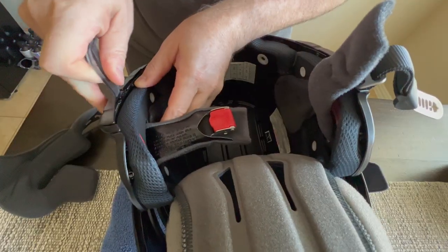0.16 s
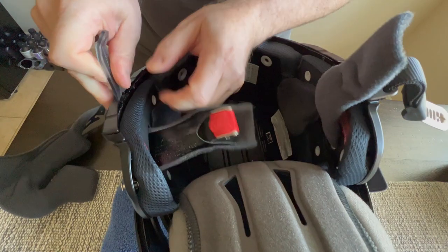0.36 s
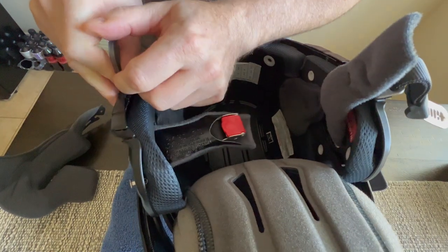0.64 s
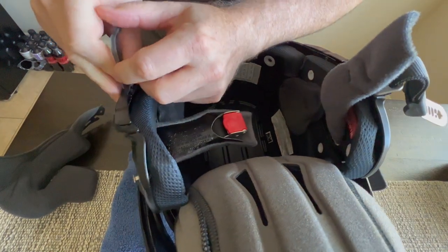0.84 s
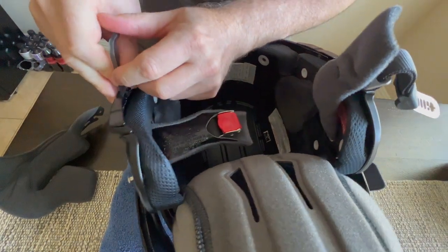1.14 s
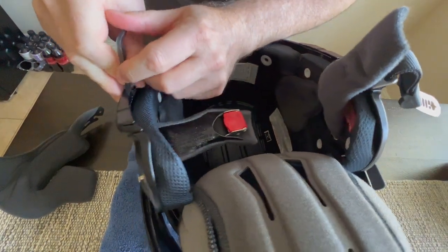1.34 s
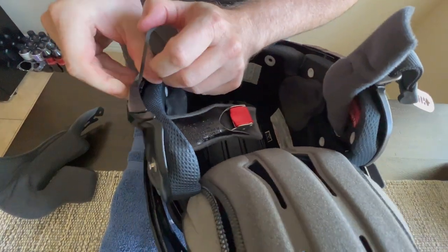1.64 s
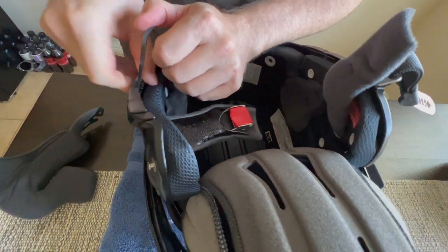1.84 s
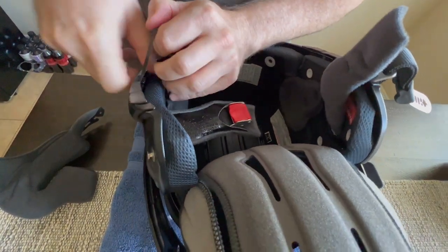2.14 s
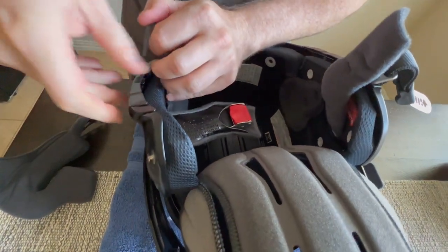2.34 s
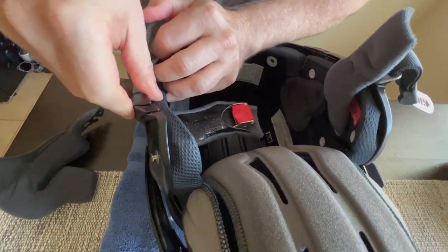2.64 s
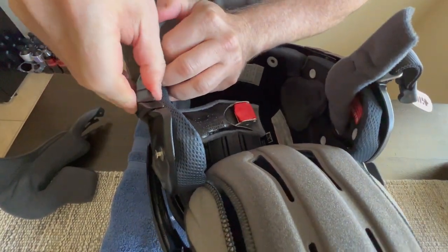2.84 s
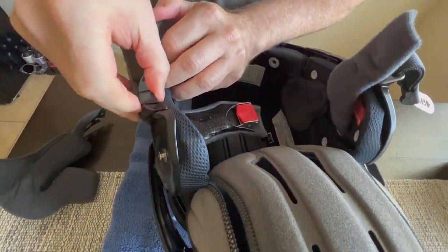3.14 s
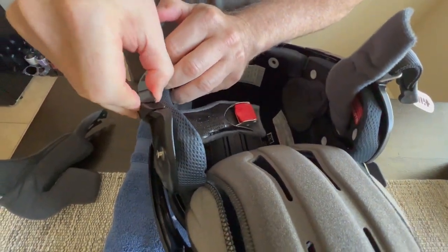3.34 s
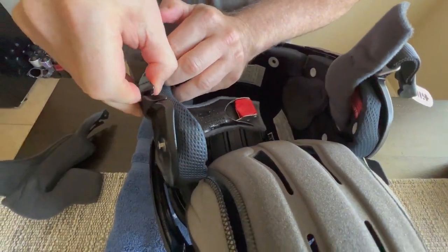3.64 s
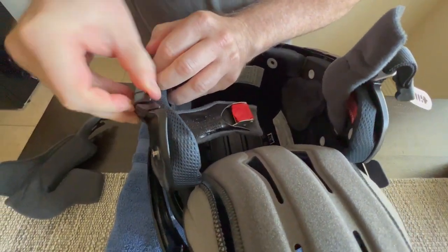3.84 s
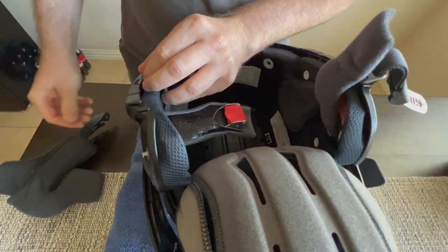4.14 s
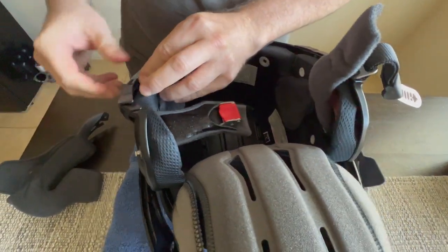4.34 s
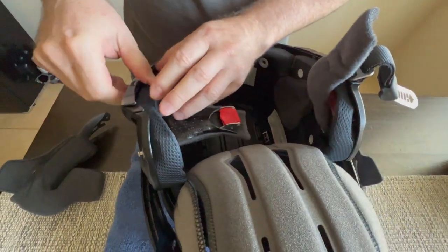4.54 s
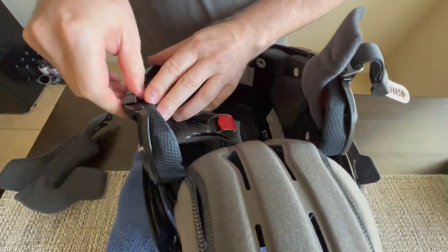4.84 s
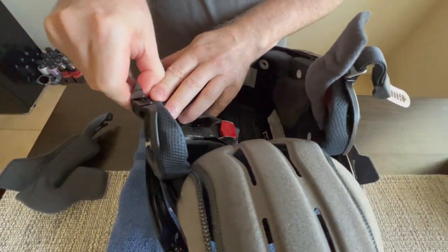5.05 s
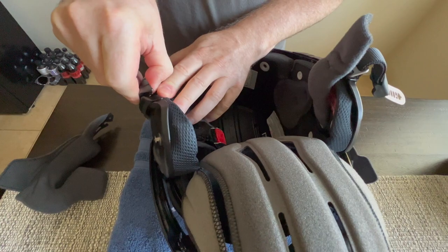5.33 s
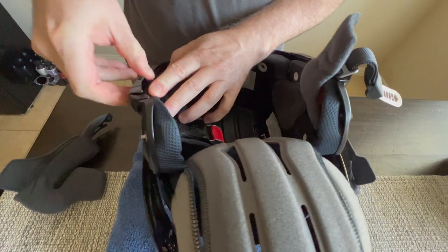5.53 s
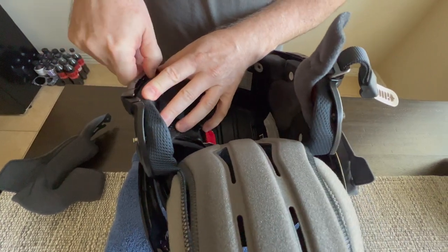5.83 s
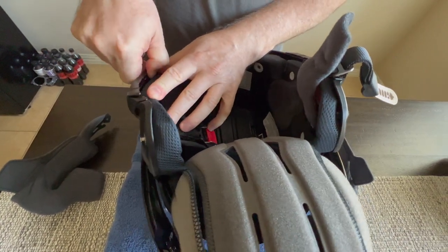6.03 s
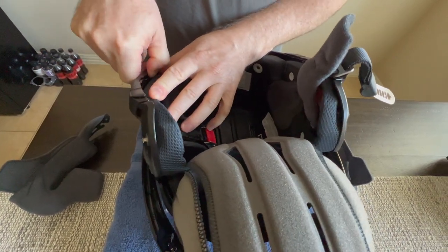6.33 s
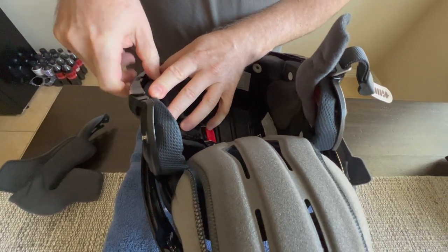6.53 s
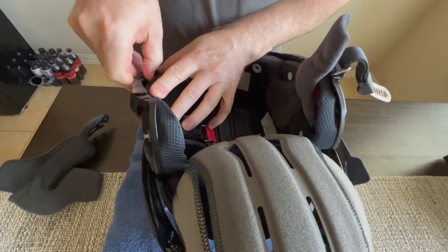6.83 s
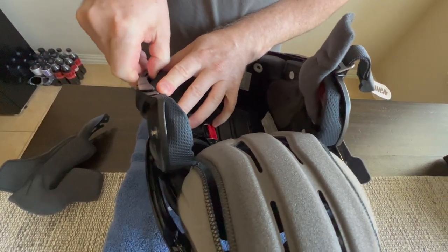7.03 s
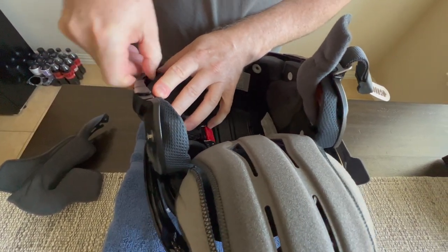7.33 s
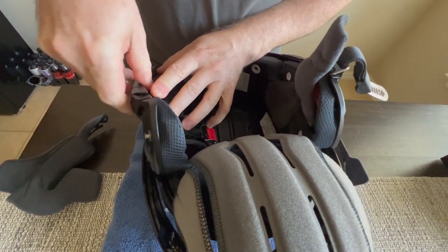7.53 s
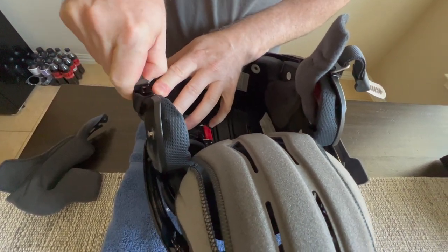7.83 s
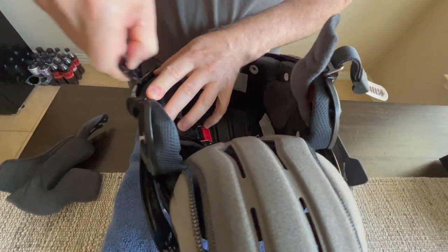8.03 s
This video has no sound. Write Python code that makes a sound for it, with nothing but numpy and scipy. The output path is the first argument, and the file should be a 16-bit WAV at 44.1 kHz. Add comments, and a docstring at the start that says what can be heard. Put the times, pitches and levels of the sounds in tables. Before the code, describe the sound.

Someone pries at a plastic fitting inside a helmet, heard in close stereo a little left of centre. After a brief metal tinkle come soft taps, padding rustle and thin squeaky scrapes. A burst of snaps with a short twang is followed by a small piece bouncing further away. The clicking and scraping resume and end in a cluster of sharp cracks. The room adds a short echo, quiet air and a faint hum.

```python
"""A living room, a stereo pair of microphones close to a helmet on a table. A small plastic prying tool
works at a clip inside: its taps ring the shell, its blade scrapes and squeaks in tiny slips, a strap
ring tinkles and fingers rub the padding. The clip snaps free with a twang and something small clatters
down further off. After more picking the part breaks loose with several cracks.
The walls answer each sound; behind it all lie quiet room air and a faint appliance hum."""
import sys
import numpy as np
from scipy import signal
from scipy.fft import rfft, irfft, next_fast_len
from scipy.io import wavfile

SR = 44100
rng = np.random.default_rng(int(sys.argv[2]) if len(sys.argv) > 2 else 0)


def unload_wav(signal):
    """Save mono or channel-first audio to the path in sys.argv[1] as 16-bit WAV at rate SR, clipped to [-1, 1]."""
    wavfile.write(
        sys.argv[1],
        SR,
        np.round(np.clip(np.atleast_2d(signal).T, -1, 1) * 32767).astype(np.int16),
    )


N = 360738
TIME = np.arange(N) / SR
TREBLE_HZ = 1500  # modes above this shift from blow to blow and reach the room wider

# resonances of the shell and its plastic fittings: pitch_hz, width_hz, level_db
SHELL_MODES = [(45.63, 26, -15.5), (67.4, 20, -9.5), (117, 36, -12.5), (152, 21, -10.5), (231, 35, -6.5),
               (362, 30, 4.5), (471, 70, -2.5), (600, 89, -7), (660, 51, -3.5), (850, 450, -10),
               (937, 120, -0.5), (1047, 75, -3.5), (1170, 40, -4), (1266, 49, -6.5), (1660, 220, -3),
               (2080, 310, -5), (2570, 300, -4), (2970, 310, -3.5), (3300, 470, -5.5), (3890, 560, -7),
               (4180, 350, -5), (4640, 530, -6), (5200, 900, -5), (5860, 580, 3), (7230, 300, 0),
               (8900, 1100, 3.5), (12200, 380, 1), (15000, 1300, -2)]
# light contacts on the shell: start_s, level_db, hardness_db (below 0 a fingertip, above 0 the tool)
SHELL_TAPS = [(.012, -59, -2), (0.25, -55.5, 1.5), (0.298, -56, -3), (0.323, -57.5, -5), (0.42, -66.5, 12),
              (0.488, -61.5, -6.5), (0.741, -65, -3.5), (.894, -74.5, -15), (0.928, -69, -6),
              (1.366, -59, -6), (1.404, -65, -6), (1.485, -66.5, -5), (1.709, -66.5, -11.5),
              (2.095, -60, -5.5), (2.171, -57, -2.5), (2.381, -70, -13), (2.668, -66, -4),
              (2.505, -60.5, 5), (2.77, -60, -2), (2.934, -55.5, -7.5), (3.111, -55.5, -9.5),
              (3.252, -59.5, -15), (3.308, -63.5, -13), (3.369, -59, -12), (3.41, -78, 17),
              (3.492, -65.5, -15), (3.765, -43, -4.5), (3.834, -46.5, -2.5), (4.24, -53.5, -13),
              (4.745, -61.5, -11), (4.832, -49.5, -6), (5.031, -59, 7), (5.114, -58, -12),
              (5.295, -52, -11.5), (5.498, -43.5, 0), (5.61, -50, -2.5), (6.139, -44.5, -3),
              (6.148, -54, -7), (6.267, -63.5, 8.5), (6.347, -58.5, -1.5), (6.408, -61, -6.5),
              (6.672, -55.5, -1.5), (6.947, -59.5, 3), (7.011, -63.5, 9.5), (7.085, -54, 0.5),
              (7.094, -51, -7.5), (7.302, -57, -7.5), (7.367, -53.5, -2), (7.52, -40.5, -7)]
# landings of the loose piece: start_s, thump_db, knock_db, crack_db, edge_db
LANDINGS = [(3.965, -39.5, -35.5, -42, -57), (3.978, -48, -38.5, -56, -72), (4.0369, -47, -39, -39, -49),
            (4.058, -52, -44.5, -35.5, -37.5), (4.067, -51, -50, -42.5, -52), (4.075, -59, -47, -58, -60),
            (4.128, -53.5, -47, -44, -47), (4.158, -50, -48.5, -55, -48.5), (4.232, -70, -61, -67, -59)]


def snapping_catches():
    """Close up, the part jolts and its catches let go, ringing the shell: direct sound and room sends."""
    # start_s, thump_db, knock_db, crack_db, edge_db, looseness, send_db, three favoured pitches_hz
    snaps = [(1.18, -37, -39.5, -48.5, -73, 0.94, -6.5, 260, 1263, 1660),
             (3.5792, -49, -30.5, -29.5, -23.5, 0.36, -4.5, 470, 1210, 2530),
             (3.5907, -41, -37, -21.5, -30, 0.09, -1, 470, 950, 2570),
             (3.603, -43, -34.5, -30.5, -42, 0.6, 0, 70, 1180, 1860),
             (3.678, -43, -31.5, -32.5, -37, 0.7, -2.5, 470, 1260, 4140),
             (3.7263, -42.5, -33, -37, -41.5, 0.63, -6.5, 470, 1040, 5200),
             (5.498, -39, -53, -43, -51.5, .9, -5, 350, 605, 2980),
             (5.612, -45.5, -44, -48, -59, .9, -3, 470, 680, 1660),
             (6.196, -38, -55, -50.5, -57, 1.55, -8, 330, 1170, 4560),
             (7.6235, -42.5, -29.5, -32.5, -39, 0.42, -4.5, 350, 960, 3890),
             (7.728, -33, -28.5, -25, -32, 0.66, -2.5, 250, 680, 3700),
             (7.743, -28, -30, -27, -29.5, 1.5, -11, 340, 1300, 5200),
             (7.869, -26.5, -27, -30.5, -33, 0.84, -2.5, 470, 900, 3300),
             (7.8801, -33.5, -39, -32, -37, 2, -2, 120, 1260, 2130),
             (7.8993, -32.5, -24.5, -27.5, -33, 2.4, -10.5, 350, 1130, 5130)]
    snaps = np.array(snaps)
    return strikes(snaps[:, :5], SHELL_MODES, send_db=snaps[:, 6], looseness=snaps[:, 5],
                   pan_share=.56, spots_hz=snaps[:, 7:])


def clip_twang(start_s, t60_s):
    """The clip springs free and rings on."""
    tones = [(1173, -42.5), (2521, -40.5), (2627, -38.5), (2810, -42), (2904, -41), (4042, -44)]
    out, t = np.zeros(N), TIME[:SR]
    add(out, sum(ringing(t, hz, db, t60_s) for hz, db in tones), start_s)
    return out


def shell_taps():
    """Tool and fingers touch the shell; a harder contact has less thump and more crack."""
    # a tap's balance at hardness 0: thump_db, knock_db, crack_db, edge_db
    balance_db = [-4, -2, -2, -14]
    # gain per dB of hardness: thump_db, knock_db, crack_db, edge_db
    hardness_gain = [-0.91, 0.042, 0.86, 0.42]
    start_s, level_db, hardness_db = np.vstack([SHELL_TAPS, grip_ticks(per_s=3.5, level_db=-72.5)]).T
    registers_db = level_db[:, None] + np.array(balance_db) + np.outer(hardness_db, hardness_gain)
    touches = np.column_stack([start_s, registers_db])
    return strikes(touches, SHELL_MODES, send_db=-.5, looseness=1.32, pan_share=1)


def grip_ticks(per_s, level_db, spread_db=4, count=40):
    """The shifting grip ticks faintly at random: rows of start_s, level_db, hardness_db."""
    start_s = np.cumsum(rng.exponential(1 / per_s, count))
    offset_db, hardness_db = spread_db * rng.standard_normal((count, 2)).T
    ticks = np.column_stack([start_s, level_db + offset_db, hardness_db])
    return ticks[start_s < TIME[-SR // 10]]


def scraping():
    """The friction of tool and fingers rings the thin blade."""
    # the blade's resonances: pitch_hz, width_hz, level_db
    blade_modes = [(2860, 83, 2.5), (4200, 85, -10.5), (4950, 290, -4), (8500, 270, 9)]
    rub = sliding(rise_share=.28, fall_share=.16, resting_db=[-77, -84, -90], restless_db=.5)
    blade = sum(from_db(db) * resonate(rub, hz, width) for hz, width, db in blade_modes)
    return from_db(-1.5) * (rub + blade)


def sliding(rise_share, fall_share, resting_db, restless_db, grit_db=-62, firm_db=-50):
    """Padding rustle, shell rub and blade scrape swell with each stroke; the fingers never quite rest."""
    # short slides: start_s, length_s, level_db, bite_db (below 0 on padding, above 0 blade on plastic)
    slides = [(0, 0.086, -69, -1), (0.202, 0.1, -62.5, 1), (.363, 0.055, -65.5, 1),
              (1.004, 0.055, -70, -2.5), (1.517, 0.056, -57.5, 0), (2.365, 0.023, -74.5, 10.5),
              (2.434, 0.048, -77.5, 13), (2.5, 0.092, -61, -2.5), (2.72, 0.062, -63, 1),
              (2.849, 0.02, -68, 4.5), (2.985, 0.048, -63, -5), (3.113, 0.011, -69, 9),
              (3.274, 0.032, -64, -13), (4.35, 0.18, -68.5, 4), (4.643, 0.036, -57.5, 15),
              (4.692, 0.068, -67.5, 13.5), (5.477, 0.013, -46.5, -4), (5.533, 0.012, -60.5, 10),
              (5.735, 0.041, -59, 2.5), (5.77, 0.024, -47.5, 1), (5.795, 0.037, -60, -1),
              (5.86, .11, -69, -3), (6.439, 0.055, -73, 6), (6.682, 0.088, -62.5, -5.5),
              (7.273, 0.074, -65, -10.5), (7.509, 0.015, -53.5, 2)]
    # rustle, rub and scrape: slips_per_s, spectrum as (pitch_hz, density_db)
    frictions = [(700, [(100, -14), (220, -6.5), (360, -1.5), (500, -9.5), (700, -6.5), (1100, -32.5),
                 (2500, -57.5)]), (2000, [(400, -32), (700, -12), (1050, -6), (1300, -7), (1900, -9),
                 (2600, -29), (6000, -60.5)]), (3500, [(1100, -29), (2100, 2.5), (2900, -1), (3500, -6),
                 (4500, -2), (7000, -12), (10000, -16), (12000, -13.5), (15000, -24), (17000, -37)])]
    # gain per dB of bite: rustle_db, rub_db, scrape_db
    bite_gain = [-0.68, 0, 0.89]
    # one long drag of the blade along the rim: time_s, scrape_db, rub_db
    rim_drag = [(1.68, -95, -88), (1.736, -62, -81), (1.776, -63, -67), (1.928, -54.5, -58),
                (2.07, -74, -70), (2.118, -55, -53.5), (2.162, -57.5, -66), (2.175, -50.5, -51),
                (2.2, -54, -64), (2.225, -84, -88), (2.28, -100, -99)]
    # trims within that drag: rustle_db, rub_db, scrape_db
    drag_trim_db = [-2, 2, -1.5]
    # fine grit torn by a hard-pressed blade: pitch_hz, density_db
    grit_spectrum = [(2500, -19), (4500, -3.5), (8000, -10), (12000, -6), (15500, -17.5), (17000, -30)]
    out, strokes = np.zeros(N), slides + skids()
    grip_db = restless_db * flutter(3.2)
    drag_s, scrape_db, rub_db = np.transpose(rim_drag)
    dragging = (TIME > drag_s[0]) * (TIME < drag_s[-1])
    for k, ((slips_per_s, spectrum), drag_db) in enumerate(zip(frictions, (rub_db, rub_db, scrape_db))):
        drag = from_db(np.interp(TIME, drag_s, drag_db) + drag_trim_db[k]) * dragging
        pressure = from_db(resting_db[k] + grip_db) + drag
        for start, length, level_db, bite_db in strokes:
            t = TIME[:int((length + .1) * SR)]
            rise = 1 - np.exp(-t / (rise_share * length))
            fall = np.exp(-np.maximum(t - length, 0) / (fall_share * length))
            add(pressure, from_db(level_db + bite_gain[k] * bite_db) * rise * fall, start)
        out += pressure * friction(spectrum, slips_per_s)
    firmness = pressure / from_db(firm_db)  # the last pressure is the blade's
    return out + from_db(grit_db) * firmness ** 2 * friction(grit_spectrum, slips_per_s=2300)


def skids(length_s=.046, level_db=-75.5, follow_share=.85, bite_db=-4.5):
    """The hand skids on in a short stroke after each tap, louder after a stronger one."""
    mean_db = np.mean(np.array(SHELL_TAPS)[:, 1])
    return [(s, length_s, level_db + follow_share * (db - mean_db), bite_db) for s, db, _ in SHELL_TAPS]


def friction(spectrum, slips_per_s, uneven_db=2, clump_db=2.5):
    """Tiny slips of uneven size come in clumps; rms 1."""
    sizes = rng.standard_normal(N) * from_db(uneven_db * rng.standard_normal(N) + clump_db * flutter(90))
    return colour((rng.random(N) < slips_per_s / SR) * sizes, spectrum)


def blade_squeaks(width_hz):
    """The blade catches and its slips fall nearly into step: a rough tone that swells and fades."""
    # start_s, length_s, pitch_hz, level_db
    squeaks = [(1.83, .14, 4170, -66), (1.868, 0.105, 2830, -52), (2.119, .06, 4900, -62),
               (2.127, .07, 4240, -63), (2.497, 0.051, 3400, -65), (2.849, 0.039, 4300, -67),
               (3.107, 0.035, 4250, -60.5), (4.636, 0.037, 3223, -53.5), (4.641, .035, 4500, -51),
               (4.648, 0.024, 5960, -55), (4.739, 0.035, 2970, -52.5)]
    out = np.zeros(N)
    for start, length, hz, level_db in squeaks:
        tone = rms_one(resonate(resonate(rng.standard_normal(SR), hz, width_hz), hz, width_hz))
        swell = signal.windows.cosine(int(length * SR))
        add(out, from_db(level_db) * swell * tone[:len(swell)], start)
    return out


def strap_rings(favour_db, scratch_db, scratch_s, split_hz):
    """Steel rings scratch over each other and ping; a ring's modes come in close pairs that beat."""
    # the rings touch: start_s, level_db, favoured_hz
    clinks = [(.398, -47, 8740), (0.4205, -39, 8740), (0.4235, -38, 8740), (0.4906, -29.5, 7900)]
    # a ring's modes: pitch_hz, level_db, t60_s
    modes = [(5970, -20, 0.14), (7500, -17, 0.08), (7920, -10, 0.061), (8737, -6.5, 0.063),
             (10700, -20, 0.06), (11110, -18, 0.074), (12600, -21, 0.043), (15140, -6, 0.049)]
    out, t = np.zeros(N), TIME[:SR // 4]
    for start, level_db, spot_hz in clinks:
        ping = np.zeros(len(t))
        for hz, db, t60 in modes:
            for offset_hz in (-split_hz, split_hz):
                mode_db = db - 5 + favour_db * nearness(hz, spot_hz) + rng.normal(0, 1.5)
                ping += ringing(t, hz + offset_hz * rng.random(), mode_db, t60)
        hiss = signal.sosfilt(band_pass(4800, 10800), rng.standard_normal(len(t)))
        scratch = from_db(scratch_db) * hiss * np.exp(-t / scratch_s)
        attack = 1 - np.exp(-t / .001)
        add(out, from_db(level_db) * attack * (ping + scratch), start)
    return out


def falling_piece():
    """A loose piece lands and bounces further from the microphones, with more room in its sound."""
    # resonances of the piece and the surface it hits: pitch_hz, width_hz, level_db
    modes = [(184, 87, -0.5), (367, 83, 5.5), (500, 150, 10), (680, 430, 12.5), (980, 350, 9),
             (1230, 180, 15.5), (1430, 210, 12), (1750, 440, 10), (2200, 500, 1), (2840, 540, -2.5),
             (3530, 990, 4.5), (4300, 1000, 4), (5200, 1100, 7.5), (6090, 750, 20.5), (6670, 760, 14),
             (7850, 1500, 12.5), (9100, 700, 20), (11200, 1100, 14.5), (13000, 1400, 19), (15450, 910, 1.5)]
    return strikes(LANDINGS, modes, send_db=6.5, looseness=1.07, pan_share=1.3)


def piece_ring():
    """The loose piece sings on briefly after each landing."""
    # its lasting tones: pitch_hz, level_db (relative to the knock), t60_s
    tones = [(3244, -14, 0.18), (5690, -16, 0.083)]
    out, t = np.zeros(N), TIME[:SR // 2]
    for start, _, knock_db, _, _ in LANDINGS:
        for hz, db, t60 in tones:
            add(out, ringing(t, hz, knock_db + db + rng.normal(0, 1.5), t60), start)
    return out


def strikes(events, modes, send_db, looseness, pan_share, spots_hz=None, send_count=5):
    """Blows on one body: direct sound at the microphones, and room sends from a few spots in turn."""
    # thump, knock, crack and edge:
    # low_hz, high_hz, travel_s, chatter_decay_s, chatter_share, left_over_right_db, right_lag_s, room_db
    registers = [(35.68, 490, 0.00032, 0.0024, 0.43, 3, .00012, -8.5),
                 (544, 1500, 0.00063, 0.003, .65, 4.5, 0.00019, -9.5),
                 (1340, 5500, 0.00084, 0.0029, 0.59, 10.5, 0.00024, -2.5),
                 (5730, 15000, 0.001, 0.0027, 0.64, 4.5, .00027, -5)]
    direct, sends = np.zeros((2, N)), np.zeros((send_count, N))
    send_db, looseness = np.broadcast_to(send_db, len(events)), np.broadcast_to(looseness, len(events))
    # a harder contact tilts each register upwards (dB per octave); the thump keeps its colour
    contrast_db = np.gradient(np.array(events)[:, 1:5], axis=1)
    tilts_db = np.clip(contrast_db - .5, -12, 12) * np.array([0, .15, .35, .9])
    for k, (low, high, travel, decay, chatter, pan_db, lag, room_db) in enumerate(registers):
        near, skirts = np.zeros(N), band_pass(low, high)
        for i, event in enumerate(events):
            gain, start = from_db(event[k + 1]), event[0] + travel
            rung = struck_at(modes, [] if spots_hz is None else spots_hz[i])
            chatter_s = decay * looseness[i]  # a loose contact chatters longer
            add(near, gain * blow(rung, low, high, skirts, chatter_s, chatter, tilts_db[i, k]), start)
            rung[rung[:, 0] > TREBLE_HZ, 1] *= 1.6  # wider treble modes for the room
            # the room hears all directions: chatter averages out, each mode arrives in its own time
            spread = blow(rung, low, high, skirts, decay, 0, tilts_db[i, k], scatter_s=.004)
            add(sends[i % send_count], gain * from_db(room_db + send_db[i]) * spread, start)
        direct += place(near, pan_db * pan_share, lag)
    return direct, sends


def struck_at(modes, spots_hz, body_lift_db=6.5, treble_lift_db=6, grip_detune=.03):
    """The spot that is struck favours some modes; the grip shifts the high ones a little."""
    hz, width, db = np.transpose(modes)
    treble = hz > TREBLE_HZ
    lift_db = np.where(treble, treble_lift_db, body_lift_db) * sum(nearness(hz, f) for f in spots_hz)
    shift = grip_detune * rng.standard_normal(len(hz)) * treble
    return np.column_stack([hz * (1 + shift), width, db + lift_db])


def nearness(hz, spot_hz, width_octaves=.094):
    """How strongly a struck spot favours a mode, 0-1."""
    return np.exp(-(np.log2(hz / spot_hz) / width_octaves) ** 2)


def blow(modes, low, high, skirts, decay_s, chatter, tilt_db, scatter_s=0):
    """A click and a chatter of micro-slips ring one register's modes; rms 1 over the first 12 ms."""
    t = TIME[:4096]
    slips = rng.standard_normal(len(t)) * np.exp(-t / decay_s) * (1 - np.exp(-2 * t / decay_s))
    force = chatter * slips / np.linalg.norm(slips) + (1 - chatter) * (t == 0)
    strengths_db = rng.normal(0, 1.8, len(modes))
    lags = (rng.random(len(modes)) * scatter_s * SR).astype(int)
    body = np.zeros(len(t))
    for k, (hz, width, db) in enumerate(modes):
        if low <= hz < high:
            gain = from_db(db + strengths_db[k] + tilt_db * np.log2(hz / low))
            body += (-1) ** k * gain * resonate(np.roll(force, lags[k]), hz, width)
    sound = signal.sosfilt(skirts, body)
    return sound / np.sqrt(np.mean(sound[:int(.012 * SR)] ** 2))


def living_room(send, build_s, echo_s, echo_db, bass_alike_hz):
    """A wall echo and a diffuse tail that dies band by band, its bass partly alike at both microphones."""
    # the room's decay: pitch_hz, t60_s
    decays = [(100, 0.5), (260, 0.45), (700, 0.72), (1840, 0.65), (4850, 0.61), (9000, 0.42), (15000, 0.3)]
    # the room's colour: pitch_hz, level_db
    spectrum = [(60, 11.5), (300, -1), (1000, 2.5), (2600, -4.5), (4800, -5), (7000, 3), (10000, -4),
                (15000, -22)]
    t, hz = TIME[:SR], np.fft.rfftfreq(SR, 1 / SR)
    mid, side = rfft(rng.standard_normal((2, SR)))
    alike = .32 / (1 + (hz / bass_alike_hz) ** 2)
    field = np.sqrt(1 + alike) * mid + np.sqrt(1 - alike) * side * [[1], [-1]]
    field *= from_db(at_hz(spectrum, hz))
    tail = np.zeros((2, SR))
    for centre, t60 in decays:
        weight = at_hz([(f, f == centre) for f, _ in decays], hz)
        fade = from_db(-60 * t / t60) * (1 - np.exp(-(t / build_s) ** 2))
        tail += irfft(field * weight, SR) * fade / np.linalg.norm(fade)
    for channel, lag in enumerate([echo_s, echo_s + .000079]):
        tail[channel, int(lag * SR)] += from_db(echo_db)
    return signal.fftconvolve(send[None], tail, axes=1)[:, :N]


def room_air(level_db, side_db):
    """Quiet room air; only its bass is common to both microphones."""
    # the air's spectrum: pitch_hz, density_db
    hush = [(15, -47), (25, -5.5), (145, -1.5), (285, -3), (363, -10), (754, -23.5), (1020, -17),
            (1890, -24.5), (6050, -35.5), (9070, -30.5), (10100, -46.5), (11300, -33), (16000, -61.5)]
    common, left, right = (colour(noise, hush) for noise in rng.standard_normal((3, N)))
    bass = signal.butter(1, 500, fs=SR)
    own = np.array([left, right])
    own -= (1 - from_db(side_db)) * signal.lfilter(*bass, own)
    return from_db(level_db) * (signal.lfilter(*bass, common) + own)


def appliance_hum(waver_db=.86, waver_rad=2.1):
    """A faint appliance hum wavers in level and phase."""
    # its tones: pitch_hz, level_db
    tones = [(119, -75.5), (157, -72)]
    return sum(from_db(db + waver_db * flutter(9.2)) * np.sqrt(2)
               * np.sin(2 * np.pi * hz * TIME + waver_rad * flutter(9.1)) for hz, db in tones)


def from_db(db):
    """Decibels to gain."""
    return 10 ** (np.asarray(db) / 20)


def rms_one(x):
    """Scale to unit rms."""
    return x / np.sqrt(np.mean(x ** 2) + 1e-20)


def at_hz(points, hz):
    """Read a table on a log-frequency axis."""
    freqs, values = np.transpose(points)
    return np.interp(np.log(np.maximum(hz, 1)), np.log(freqs), values)


def band_pass(low_hz, high_hz):
    """Filter sections of a gentle band-pass."""
    return signal.butter(2, [low_hz, high_hz], "band", fs=SR, output="sos")


def colour(x, spectrum):
    """Give a steady sound a spectrum; rms 1."""
    size = next_fast_len(N, real=True)
    gains = from_db(at_hz(spectrum, np.fft.rfftfreq(size, 1 / SR)))
    return rms_one(irfft(rfft(x, size) * gains, size)[:N])


def resonate(x, hz, width_hz):
    """One resonance with gain 1 at its peak."""
    r = np.exp(-np.pi * width_hz / SR)
    poles = [1, -2 * r * np.cos(2 * np.pi * hz / SR), r * r]
    return signal.lfilter(np.array([1, 0, -1]) * (1 - r * r) / 2, poles, x + 1e-18)


def ringing(t, hz, level_db, t60_s):
    """One mode dying away freely."""
    return from_db(level_db - 60 * t / t60_s) * np.sin(2 * np.pi * hz * t)


def flutter(rate_hz):
    """Random wavering; rms 1."""
    return rms_one(np.interp(TIME * rate_hz, np.arange(4096), rng.standard_normal(4096)))


def place(x, pan_db, lag_s=0):
    """A source to the left is louder at the left microphone and reaches the right one lag_s later."""
    right = np.roll(x, int(round(lag_s * SR)))
    gains = rms_one(from_db([pan_db / 2, -pan_db / 2]))
    return np.array([x * gains[0], right * gains[1]])


def add(track, sound, start_s):
    """Mix a short sound into a track."""
    start = int(start_s * SR)
    track[start:start + len(sound)] += sound[:N - start]


def scene():
    """Close work on the helmet and the more distant clatter share one room, left of centre."""
    snaps, snap_sends = snapping_catches()
    clatter, clatter_sends = falling_piece()
    rub = scraping() + blade_squeaks(width_hz=520)
    rings = strap_rings(favour_db=6, scratch_db=-13.5, scratch_s=.016, split_hz=67)
    taps, tap_sends = shell_taps()
    singing, twang = piece_ring(), clip_twang(start_s=3.592, t60_s=.45)
    direct = taps + snaps + clatter + place(singing, pan_db=12) + place(twang, pan_db=2)
    direct += place(rub, pan_db=5, lag_s=.00027) + place(rings, pan_db=4)
    sends = tap_sends + snap_sends + clatter_sends
    sends[0] += from_db(-8) * rub + from_db(-18) * rings + from_db(-12) * singing
    echoes = sum(living_room(send, build_s=.0034, echo_s=.01, echo_db=-7.5, bass_alike_hz=452)
                 for send in sends)
    room_tone = room_air(level_db=-67.5, side_db=-2.5) + appliance_hum()
    return direct + echoes * from_db([[1.1], [-1.1]]) + room_tone * from_db([[1.2], [-1.2]])


def record(dry):
    """The two microphones differ in the treble, and the top is cut steeply at 16.5 kHz."""
    # balance of the pair: pitch_hz, left_over_right_db
    mic_balance = [(1200, 1), (2200, 1.5), (4000, 4), (7000, 10), (8000, -4), (9200, -2.5), (15000, -6)]
    size = next_fast_len(N + SR // 10, real=True)
    balance_db = at_hz(mic_balance, np.fft.rfftfreq(size, 1 / SR))
    heard = irfft(rfft(dry, size) * from_db([balance_db / 2, -balance_db / 2]), size)[:, :N]
    return signal.sosfilt(signal.ellip(10, .1, 90, 16500, fs=SR, output="sos"), heard)


dry = scene()
out = record(dry)
unload_wav(out)
```